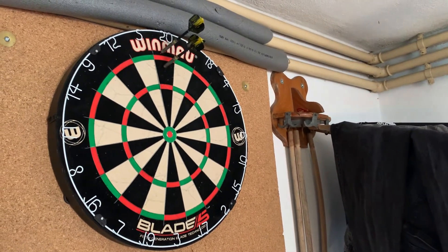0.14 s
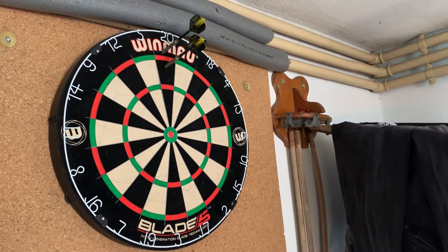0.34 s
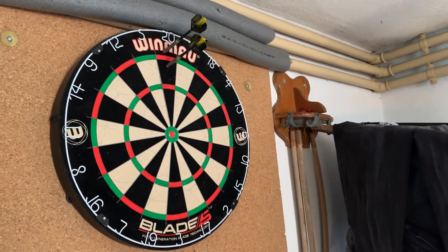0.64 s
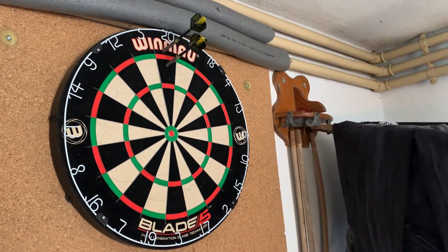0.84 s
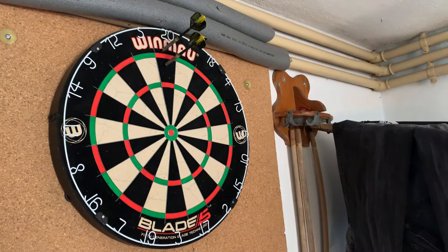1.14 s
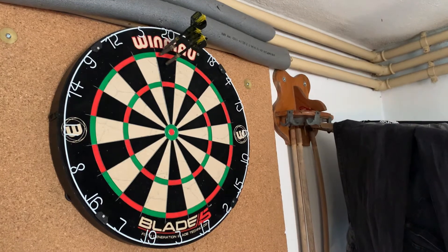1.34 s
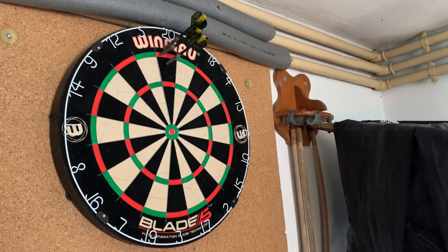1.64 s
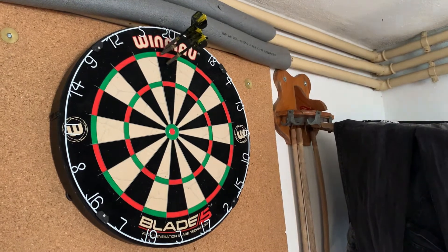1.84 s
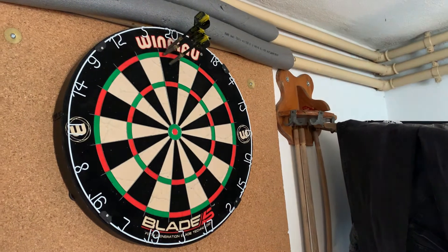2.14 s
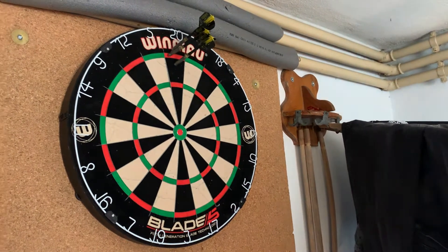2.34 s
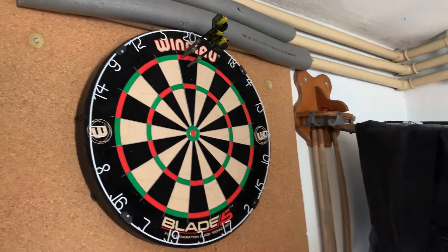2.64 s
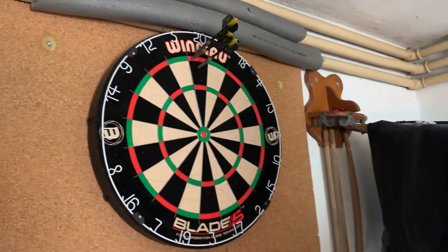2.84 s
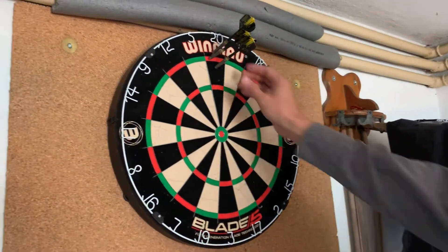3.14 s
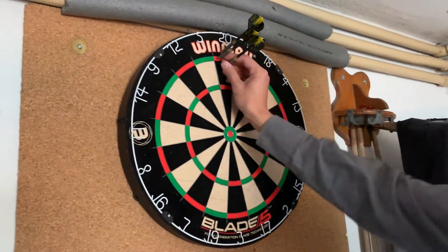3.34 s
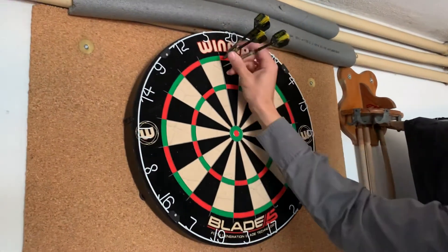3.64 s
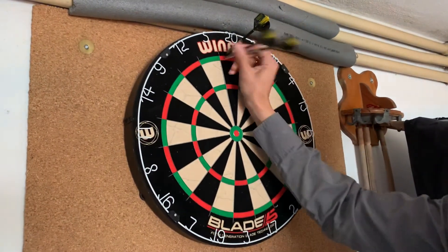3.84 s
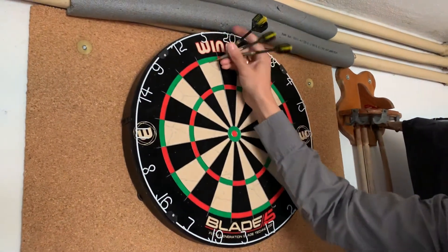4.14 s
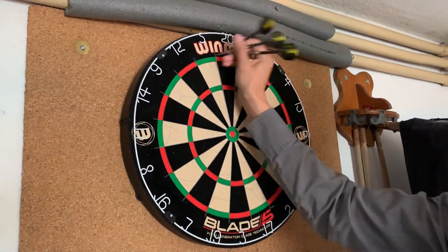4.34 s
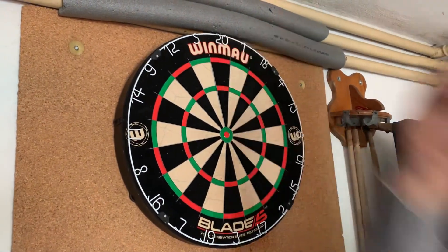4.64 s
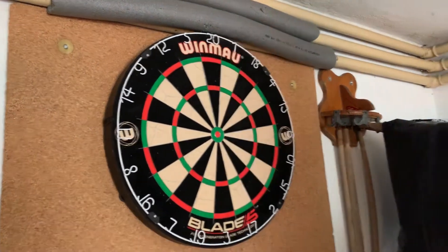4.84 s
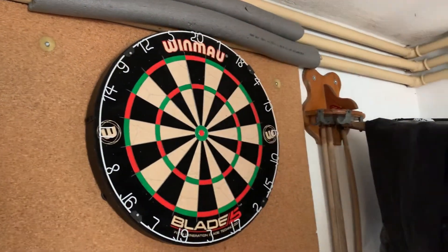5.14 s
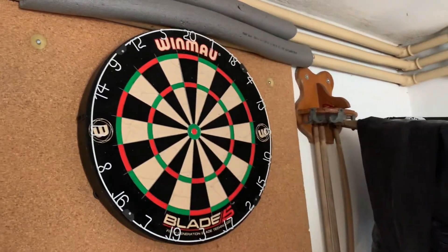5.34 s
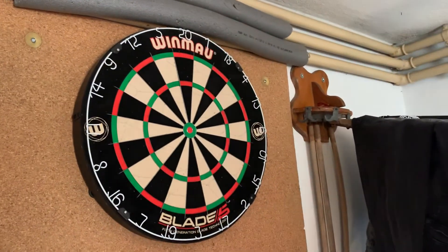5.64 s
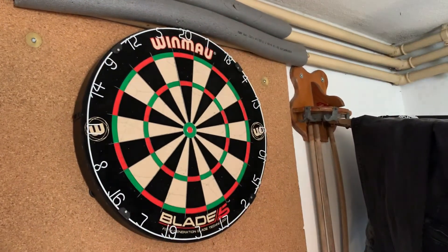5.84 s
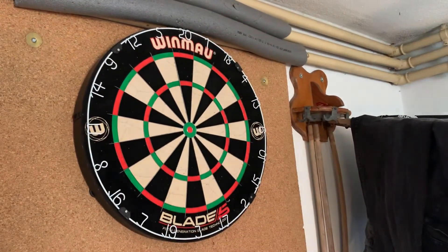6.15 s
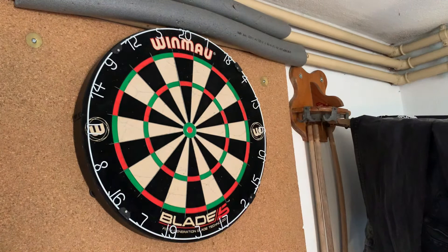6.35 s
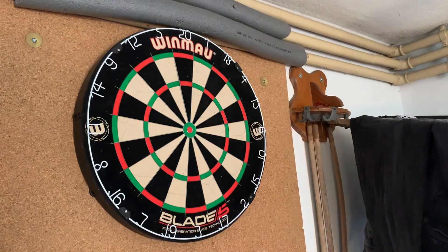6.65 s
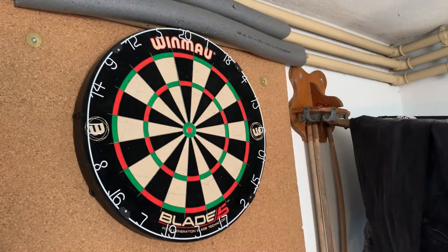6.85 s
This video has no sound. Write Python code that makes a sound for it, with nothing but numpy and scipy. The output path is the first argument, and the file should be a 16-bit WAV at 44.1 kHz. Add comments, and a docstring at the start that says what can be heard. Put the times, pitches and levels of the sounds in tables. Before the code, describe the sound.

Quiet room, one hard dart thud, shoes knocking and scuffing on the floor with cloth rustle, small metallic dart clicks, then softer walking steps.

```python
"""A dart thuds into a bristle board on a cork wall in a small room. The thrower walks up over a booming floor,
shoes knocking and scuffing, clothes rustling, pulls the darts, whose barrels click together, and walks back.
A low building rumble and microphone hiss lie under it all. Blows are struck modes, filtered force pulses and
noise bursts, each with a room tail; sliding, cloth, rumble and hiss are filtered noise."""
import sys
import numpy as np
from scipy import signal
from scipy.fft import rfft, irfft, next_fast_len
from scipy.io import wavfile
from scipy.ndimage import uniform_filter1d, map_coordinates

SR = 44100
rng = np.random.default_rng(int(sys.argv[2]) if len(sys.argv) > 2 else 0)


def voltage_ratio(level):
    """Linear amplitude factor for a level in decibels (scalar or array-like)."""
    return 10 ** (np.asarray(level, float) / 20)


def to_wav(sig):
    """Store sig (one row per channel, or 1-D mono) as 16-bit WAV at the path in sys.argv[1].

    Samples outside -1..1 are clipped; the rate is SR.
    """
    pcm = np.clip(np.atleast_2d(sig), -1, 1) * 32767
    pcm = np.round(pcm).astype(np.int16)
    wavfile.write(sys.argv[1], SR, pcm.T)  # frames by channels


N = 308685
BLOW_T = np.arange(SR // 8) / SR  # time axis of one short sound, s

# the dart: point touches, barrel is stopped and rebounds (t/s, shake peak/dB, pan/dB, fibre crunch peak/dB)
DART_JOLTS = [(1.256, -39, -3.5, -33), (1.263, -18.5, -8, -33), (1.269, -18, 4.5, -37)]
# modes of the board and wall panel (f/Hz, level/dB, t60/s)
BOARD_MODES = [(62, -30, .25), (84, -23, .32), (125, -28, 0.37), (183, -19, 0.022), (270, -9, 0.041),
               (361, -11, 0.051), (426, -14, 0.075), (538, -21.5, 0.015), (723, 0.5, 0.011),
               (750, -0.5, 0.02), (905, -2, 0.022), (980, -6, .02), (1207, 3.5, 0.022), (1414, -8, 0.043),
               (1580, -5.5, 0.011), (1852, -12.5, 0.035), (2360, -23, 0.018), (6016, -6, 0.028)]
# bristle fibres crunching and scratching (f/Hz, level/dB)
FIBRE_COLOUR = [(1500, -11.5), (2500, -5.5), (3800, -2.5), (6000, 2), (7500, -3), (10000, -6), (15000, -17)]
# shoe contacts (t/s, knock peak/dB, thump peak/dB, sole crack peak/dB, boom peak/dB)
SHOE_CONTACTS = [(0.245, -92, -75, -95, -64), (0.523, -90, -71, -87, -60), (1.087, -68.5, -82, -87, -57),
                 (1.994, -61, -51.5, -54.5, -45), (2.067, -69, -57, -75, -67), (2.142, -51, -46, -59, -65),
                 (2.369, -78, -66, -79, -65), (2.404, -78, -79, -79, -60), (2.529, -57, -57, -80, -47.5),
                 (2.609, -36, -41, -42.5, -46.5), (2.922, -44, -53, -62, -61),
                 (2.973, -24.5, -25, -26.5, -31.5), (3.039, -60, -47, -55, -40),
                 (3.114, -49.5, -44.5, -55, -53), (3.17, -60, -60, -65, -54), (3.308, -48, -59, -80, -72),
                 (3.339, -36.5, -38, -51.5, -47), (3.417, -78, -48, -55, -72),
                 (3.579, -53.5, -60, -79.5, -62), (3.723, -62.5, -79, -66.5, -75),
                 (4.253, -48, -55, -66.5, -59), (4.625, -49, -53, -49, -58.5),
                 (4.759, -54.5, -51, -75, -67), (5.154, -69, -55, -39, -49), (5.21, -40, -40, -49, -48),
                 (5.259, -39, -34, -34, -39.5), (5.311, -51, -53, -65, -51),
                 (5.532, -39.5, -44.5, -54, -47), (5.58, -53, -56.5, -68, -49.5),
                 (5.845, -45.5, -56, -44, -49.5), (5.857, -42, -45.5, -65, -58),
                 (5.916, -48, -48.5, -69, -49), (6.101, -50.5, -82, -74, -74), (6.229, -45, -57, -55, -46),
                 (6.675, -56.5, -61, -65.5, -54)]
# low modes of the room and floor (f/Hz, width/Hz, level/dB)
LOW_MODES = [(45.14, 21.8, 5), (81.6, 12.6, 2), (98, 8.6, 1), (122.3, 39.5, -2.5), (148, 32, -20)]
# soles rubbing on the floor (f/Hz, density/dB per Hz)
SCUFF_COLOUR = [(600, -28.5), (1300, 0), (2200, -2), (3500, -2), (5000, -1), (6200, 0), (7500, -4),
                (9000, -13.5), (11000, -21), (15500, -18.5)]
# continuous scuffing and rustling of the walker, rising and falling with movement
# (t/s, scuff level/dB, rustle level/dB)
MOVEMENT = [(0.0, -96, -81), (0.92, -92, -85.5), (1.32, -83, -74), (1.64, -83.5, -78), (1.99, -71, -67),
            (2.14, -66, -60), (2.92, -74, -67), (3.27, -76.5, -67.5), (3.59, -96.5, -101), (3.78, -89, -63),
            (3.96, -90, -73), (4.4, -75.5, -71.5), (4.7, -77.5, -61.5), (5.11, -70.5, -71),
            (5.24, -61.5, -56.5), (5.38, -69, -66.5), (5.59, -75.5, -68), (5.91, -67.5, -70.5),
            (6.06, -68.5, -69), (6.3, -68.5, -69.5), (6.49, -92, -72), (7.0, -83.5, -81)]


def unit(x):
    """Scale to rms 1."""
    return x / np.sqrt(np.mean(x ** 2) + 1e-20)


def peaked(x, db):
    """Scale to a peak level."""
    return x / np.abs(x).max() * voltage_ratio(db)


def along(points, hz):
    """Read (f/Hz, value) points on a log frequency axis."""
    f, value = np.transpose(points)
    return np.interp(np.log(hz + 1), np.log(f + 1), value)


def shaped(spectrum):
    """Gain against frequency from (f/Hz, level/dB) points."""
    return lambda hz: voltage_ratio(along(spectrum, hz))


def gain_curve(s, db):
    """Gain per sample from a curve of dB over time."""
    return voltage_ratio(np.interp(np.arange(N) / SR, s, db))


def filtered(x, response):
    """Multiply the spectrum of x by a complex response of frequency."""
    n = x.shape[-1]
    m = next_fast_len(n + 8192)
    return irfft(rfft(x, m) * response(np.fft.rfftfreq(m, 1 / SR)), m)[..., :n]


def body(peaks):
    """Response of broad resonances (f/Hz, width/Hz, level/dB), their signs alternating."""
    def response(f):
        total = 0
        for k, (centre, width, db) in enumerate(peaks):
            damping = 1j * f * width
            total = total + (-1) ** k * voltage_ratio(db) * damping / (centre * centre - f * f + damping)
        return total
    return response


def push(length):
    """The force of a blow: one smooth hump, length s long."""
    return np.hanning(max(round(length * SR), 3))


def ring(modes, spread_db, tilt_db=0, rise=0.00066):
    """Struck modes, at new strengths for every blow, swelling over the contact time (rise in s)."""
    hz, db, t60 = np.transpose(modes)[..., None]
    db = db + spread_db * rng.standard_normal(hz.shape) + tilt_db * np.log2(hz / 4000)
    tones = voltage_ratio(db - 60 * BLOW_T / t60) * np.sin(2 * np.pi * hz * BLOW_T)
    return np.sum(tones, axis=0) * (1 - np.exp(-BLOW_T / rise))


def puff(shape_t60, rise):
    """A short burst of contact noise, its spectrum evened out so that no chance pitch dominates."""
    shape = voltage_ratio(-60 * BLOW_T / shape_t60) * (1 - np.exp(-BLOW_T / rise))
    z = rfft(rng.standard_normal(len(BLOW_T)) * shape)
    even = irfft(z / (np.abs(z) + 1e-9), len(BLOW_T))
    return even * np.sqrt(shape)  # this second fade makes the burst shorter than shape_t60


def diffuse(pair):
    """Two unrelated signals mixed into left and right as alike as a room makes them."""
    # likeness of left and right (f/Hz, correlation)
    likeness = [(60, 0.97), (130, 0.87), (290, 0.65), (640, 0.042), (1600, 0), (8000, 0.096)]

    def mid_side(hz):
        angle = np.arccos(np.clip(along(likeness, hz), -1, 1)) / 2
        return np.array([np.cos(angle), np.sin(angle)])
    mid, side = filtered(pair, mid_side)
    return np.array([mid + side, mid - side])


def wobble(rate):
    """A smooth random curve, rate knots a second."""
    knots = rng.standard_normal(int(N * rate / SR) + 4)
    return map_coordinates(knots, [np.arange(N) * rate / SR])


def rush(colour, patchy_db, flutter_db, rate):
    """Diffuse coloured noise of rms 1, in random patches of time and pitch, its level fluttering."""
    z = signal.stft(rng.standard_normal((2, N)), nperseg=256)[2]
    field = uniform_filter1d(rng.standard_normal(z.shape[1:]), size=5, axis=0)
    patches = unit(uniform_filter1d(field, size=8, axis=1))
    noise = signal.istft(z * voltage_ratio(patchy_db * patches), nperseg=256)[1][:, :N]
    return unit(diffuse(filtered(noise, colour)) * voltage_ratio(flutter_db * wobble(rate)))


def add(out, s, x, pan_db, room_db, lag=0):
    """Place a sound at s: direct path, then a fresh room tail in which each frequency dies at its own speed."""
    # reverberation of the small room (f/Hz, t60/s)
    room_decay = [(50, 0.18), (120, 0.16), (300, 0.3), (1000, 0.2), (5000, 0.22), (10000, 0.16)]
    hz, t, z = signal.stft(rng.standard_normal((2, SR // 3)), SR, nperseg=256)
    decay = voltage_ratio(-60 * t / along(room_decay, hz)[:, None]) * (t > .003)
    tail = signal.istft(z * decay, SR, nperseg=256)[1]
    tail = diffuse(tail / np.linalg.norm(tail[0]))
    wet = voltage_ratio(room_db) * signal.fftconvolve(x[None], tail, axes=1)

    def ports(f):
        # pan and lag (left later than right, s) fade out in the bass, which is alike on both sides
        grip = f / (f + 300)
        pan = voltage_ratio(np.array([[pan_db / 2], [-pan_db / 2]]) * grip)
        return pan * np.exp(-1j * np.pi * f * grip * np.array([[lag], [-lag]]))
    wet[:, :len(x)] += filtered(x, ports)
    out[:, round(s * SR):][:, :wet.shape[1]] += wet


def aftermath(blows, over_db, swell, t60):
    """Power that swells after each (t/s, level/dB) blow and dies away."""
    s, db = np.transpose(blows)[..., None]
    t = np.maximum(np.arange(N) / SR - s, 0)
    gain = voltage_ratio(db + over_db - 60 * t / t60) * np.minimum(t / swell, 1)
    return np.sum(gain ** 2, axis=0)


def dart(silence):
    """Each jolt shakes the board's modes while the fibres crunch."""
    out = silence.copy()
    for s, shake_db, pan_db, crunch_db in DART_JOLTS:
        board = ring(BOARD_MODES, 2, rise=.0015)
        shake = np.convolve(board, push(0.00024))[:len(BLOW_T)]
        crunch = filtered(puff(.06, 0.0014), shaped(FIBRE_COLOUR))
        hit = peaked(shake, shake_db) + peaked(crunch, crunch_db)
        add(out, s, hit, pan_db, room_db=-2.0, lag=-0.000083)
    return out


def steps(silence):
    """Each contact booms in the room's low modes, thumps the slab, knocks the surface and cracks off the sole."""
    # low body of the floor, then its hard surface (f/Hz, width/Hz, level/dB)
    slab = [(176, 215, -6.5), (257, 66, 1), (325, 28.3, 1), (428, 38, 0), (570, 480, -13)]
    tile = [(694, 107, 4), (930, 170, 6), (1294, 353, 5.5), (2100, 1070, -6)]
    # crack of the shoe sole (f/Hz, level/dB)
    sole = [(2000, 6.5), (3400, 9), (5000, 1), (6600, 1), (8500, -14.5), (11000, -37), (15000, -40)]
    out = silence.copy()
    slow_push = np.pad(push(.007), (0, len(BLOW_T)))[:len(BLOW_T)]
    quick_push = np.pad(push(0.0016), (0, len(BLOW_T)))[:len(BLOW_T)]
    sole_colour = lambda hz: voltage_ratio(along(sole, hz) - 40 * (hz < 1500))
    for s, knock_db, thump_db, crack_db, boom_db in SHOE_CONTACTS:
        boom = peaked(filtered(slow_push, body(LOW_MODES)), boom_db)
        thump = peaked(filtered(quick_push, body(slab)), thump_db)
        knock = peaked(filtered(puff(0.038, 0.0012), body(tile)), knock_db)
        crack = peaked(filtered(puff(0.022, 0.0022), sole_colour), crack_db)
        add(out, s, boom, 0, room_db=-5.5)
        add(out, s, thump + knock + crack, pan_db=-6, room_db=-0.36, lag=0.000612)
    return out


def clicks(silence):
    """A few ms of scratchy contact coloured by the barrels' short ring; the tug stirs the board's middle modes."""
    # barrels touching and tugging at the board (t/s, peak/dB, tilt/dB per octave, pan/dB, tug peak/dB)
    touches = [(3.4084, -33.5, 5, -12, -44), (3.4139, -44.5, 4.5, 34, -44.5), (3.7579, -42.5, 8, -4, -56),
               (3.8153, -38.5, 9, -7, -49), (3.8353, -47, 11, 16, -50.5), (3.851, -61, 12, -24, -60),
               (3.9134, -48, -7, -4, -57), (3.9302, -47.5, 5, -2.5, -70), (4.0013, -48.5, 5.5, -13.5, -55),
               (4.123, -40.5, 11.5, -6, -52), (4.2278, -59, -21, -3, -58), (4.2696, -56.5, -2, -7, -68),
               (4.3285, -57, -2, -7, -63), (4.81, -59, 7, -11, -69), (5.1096, -49.5, 3, -2, -53.5),
               (5.3364, -49.5, 8.5, 2, -61)]
    # metal barrels and plastic shafts (f/Hz, level/dB, t60/s)
    barrel = [(1275, -0.5, 0.024), (1830, 2, 0.0098), (1935, 7.5, 0.011), (2140, 1, 0.015),
              (4210, 5, 0.0043), (5000, -0.5, 0.0088), (5470, -8, 0.012), (7030, -10, 0.0071),
              (8130, -10, 0.0052), (9870, -0.5, 0.0026)]
    scratch_over_ring_db = -3.1
    out = silence.copy()
    for s, db, tilt_db, pan_db, tug_db in touches:
        metal = ring(barrel, 2, tilt_db)
        tink = signal.fftconvolve(metal, puff(0.017, 0.0016))[:len(BLOW_T)]
        scratch = filtered(puff(0.021, 0.00055), shaped(FIBRE_COLOUR))
        board = ring(BOARD_MODES[4:9], 3)
        tug = np.convolve(board, push(0.0026))[:len(BLOW_T)]
        touch = peaked(tink, db) + peaked(scratch, db + scratch_over_ring_db) + peaked(tug, tug_db)
        add(out, s, touch, pan_db, room_db=0.5, lag=.0001)
    return out


def slides(silence):
    """Friction noise that swells, then dies, nearly smooth in grain."""
    # soles sliding and fibres letting go (t/s, top level/dB, rise/s, fall t60/s, tilt/dB per octave)
    strokes = [(1.07, -79, 0.015, 0.13, 5), (1.928, -60, 0.03, 0.078, -5), (2.1, -62.5, 0.038, 0.31, -2.5),
               (2.461, -70.5, 0.027, 0.28, -3), (2.926, -49, 0.016, 0.065, -7),
               (2.947, -36, 0.035, 0.019, -12), (3.275, -82, 0.0091, 0.074, -17),
               (3.347, -57, 0.039, 0.13, 1.5), (3.799, -59.5, 0.0092, 0.058, -3),
               (3.876, -66.5, 0.011, 0.13, -2), (3.9, -61, 0.015, 0.11, 5), (3.984, -57.5, .015, 0.032, 5),
               (4.1, -72, 0.016, .03, 8), (4.225, -72, 0.035, 0.1, 4), (4.619, -65, 0.015, 0.1, 2),
               (5.125, -46.5, 0.025, 0.107, 0.5), (5.49, -49.5, 0.017, 0.058, -4),
               (6.029, -65.5, 0.028, 0.055, -3), (6.107, -64, .012, 0.25, 1.5),
               (6.143, -59, 0.024, .12, -13.5), (6.238, -55, 0.0061, 0.095, -0.2),
               (6.38, -52, 0.024, 0.14, -0.1)]
    out = silence.copy()
    for s, db, rise, t60, tilt_db in strokes:
        stroke = np.minimum(BLOW_T / rise, 1) ** 2 * voltage_ratio(-60 * np.maximum(BLOW_T - rise, 0) / t60)
        grains = rng.standard_normal(len(BLOW_T)) * voltage_ratio(1.07 * rng.standard_normal(len(BLOW_T)))
        colour = lambda hz: voltage_ratio(along(SCUFF_COLOUR, hz) + tilt_db * np.log2(hz / 4000 + 0.021))
        rub = unit(filtered(grains, colour))
        add(out, s, voltage_ratio(db) * stroke * rub, pan_db=-4, room_db=2.0, lag=0.000488)
    return out


def scuffing():
    """Soles rub on the floor: friction noise in uneven patches that follows the walker's movement."""
    s, scuff_db, _ = np.transpose(MOVEMENT)
    return gain_curve(s, scuff_db) * rush(shaped(SCUFF_COLOUR), 3.3, 0.98, 200)


def rustling():
    """Cloth rubs in uneven patches of noise, and floor and wall rattle on after each blow."""
    # rubbing cloth (f/Hz, density/dB per Hz)
    cloth = [(88, -22), (150, -9.5), (310, -6.5), (384, -12.5), (603, -8.5), (912, -12.5), (1260, -12),
             (3000, -26), (3900, -53.5), (6600, -120)]
    s, _, rustle_db = np.transpose(MOVEMENT)
    thumps = [(row[0], row[2]) for row in SHOE_CONTACTS]
    thumps.append((DART_JOLTS[1][0], -38))  # what the dart passes into the wall (t/s, level/dB)
    rattle = aftermath(thumps, over_db=-18.5, swell=.025, t60=0.46)
    gain = np.sqrt(gain_curve(s, rustle_db) ** 2 + rattle)
    return gain * rush(shaped(cloth), 2.4, 2.7, 45)


def rumbling():
    """Noise in the low modes wanders in level; the structure shudders on after each blow."""
    # low rumble of the building, its level wandering (t/s, level/dB)
    rumble_level = [(0.0, -67.5), (0.84, -73.5), (1.03, -67.5), (1.3, -64.5), (1.79, -62.5), (2.05, -70.5),
                    (2.18, -51.5), (2.55, -58.5), (2.71, -59.5), (3.27, -66), (3.43, -69), (3.65, -64),
                    (4.0, -60), (5.15, -60.5), (5.4, -58), (5.65, -62), (7.0, -58.5)]
    booms = [(row[0], row[4]) for row in SHOE_CONTACTS]
    booms.append((DART_JOLTS[1][0], -54.5))  # what the dart passes into the wall (t/s, level/dB)
    shudder = aftermath(booms, over_db=-2, swell=0.02, t60=0.47)
    gain = np.sqrt(gain_curve(*np.transpose(rumble_level)) ** 2 + shudder)
    return gain * rush(body(LOW_MODES), 0.16, 1.2, 12)


def microphone_hiss():
    """Steady coloured noise, nearly free of patches and flutter."""
    # hiss (f/Hz, density/dB per Hz)
    hiss_colour = [(70, -24), (120, -3.5), (370, -19), (800, -32), (1700, -26.5), (2700, -30),
                   (4800, -29.5), (7600, -33.5), (9500, -29), (13000, -33.5), (16000, -31.5)]
    return voltage_ratio(-77.5) * rush(shaped(hiss_colour), .3, 0.239, 5)


def scene():
    """Blows and slides in the room over the walker's scuffing and rustling and the rumble."""
    silence = np.zeros((2, N + SR))
    events = dart(silence) + steps(silence) + clicks(silence) + slides(silence)
    return events[:, :N] + scuffing() + rustling() + rumbling()


def band_limit(x):
    """A steep low-pass at the top of the band."""
    return signal.sosfilt(signal.butter(12, 16110, fs=SR, output="sos"), x)


def record(dry):
    """The microphone adds hiss; a steep bass cut and a treble colour shape the whole mix."""
    # treble colour, with a dip in the top octave (f/Hz, level/dB)
    treble = [(10300, 1), (10900, -2), (11200, -14.5), (12000, -24.5), (12400, 1.5), (14500, -1),
              (14900, -5.5), (16000, -6.5)]
    bass_cut_hz = 49
    bass_cut = signal.butter(5, bass_cut_hz, "high", analog=True)
    colour = lambda hz: signal.freqs(*bass_cut, hz)[1] * voltage_ratio(along(treble, hz))
    mix = filtered(dry + microphone_hiss(), colour)
    return band_limit(mix)


dry = scene()
out = record(dry)
to_wav(out)
```